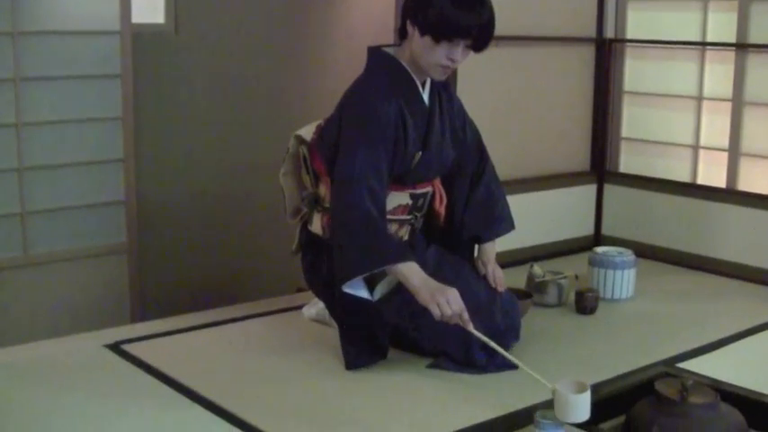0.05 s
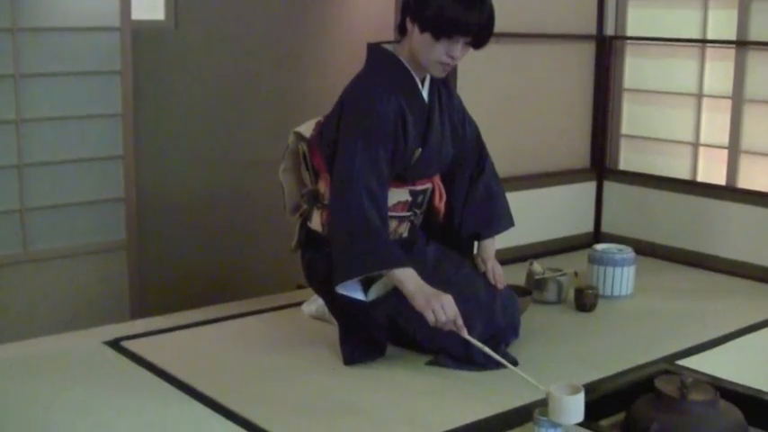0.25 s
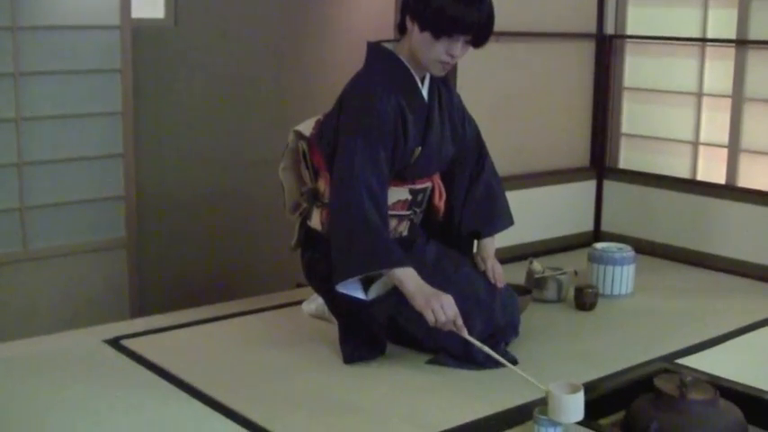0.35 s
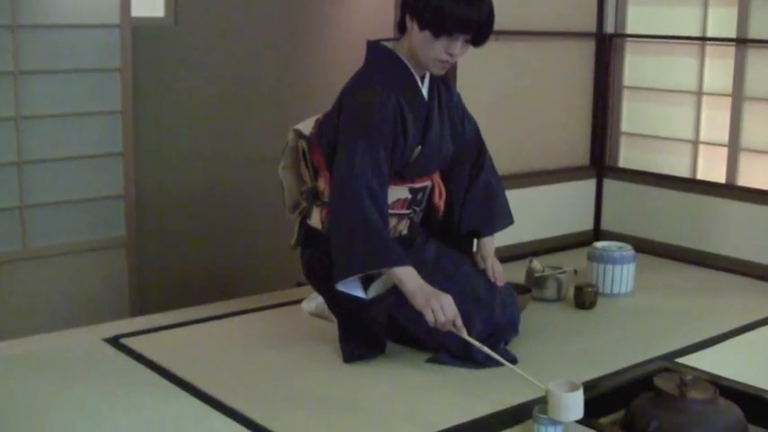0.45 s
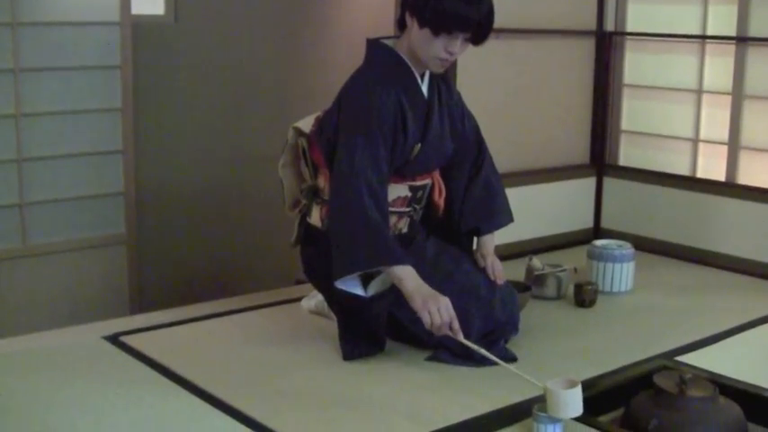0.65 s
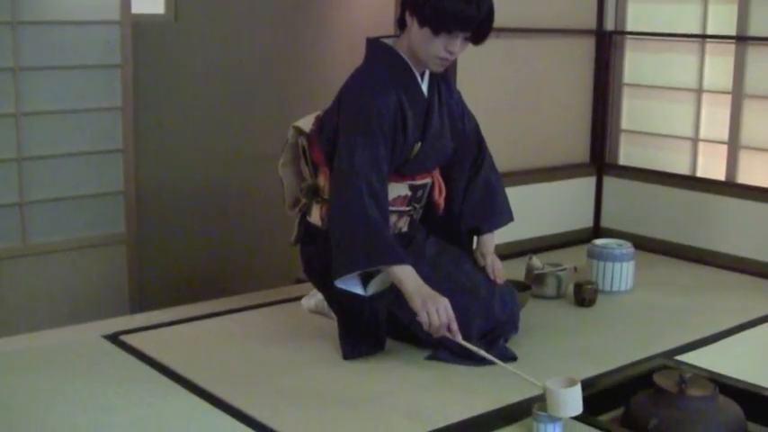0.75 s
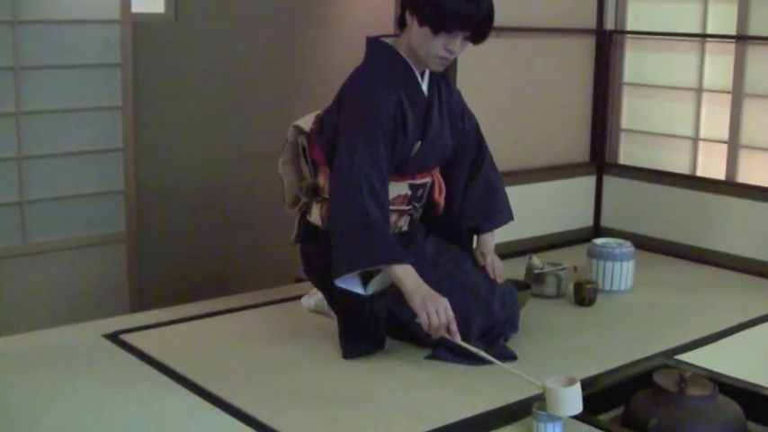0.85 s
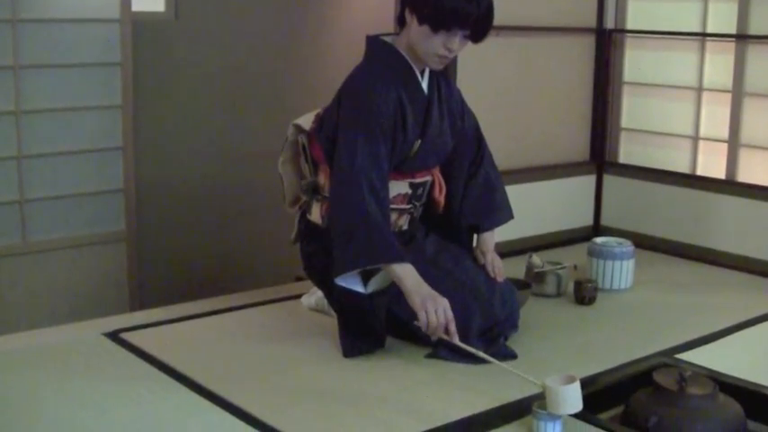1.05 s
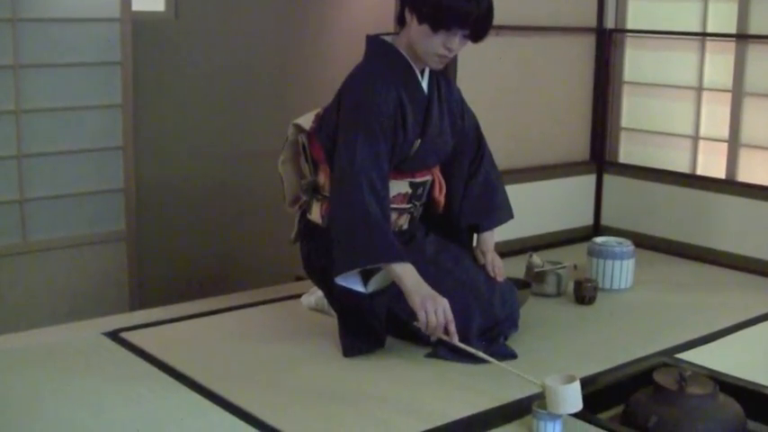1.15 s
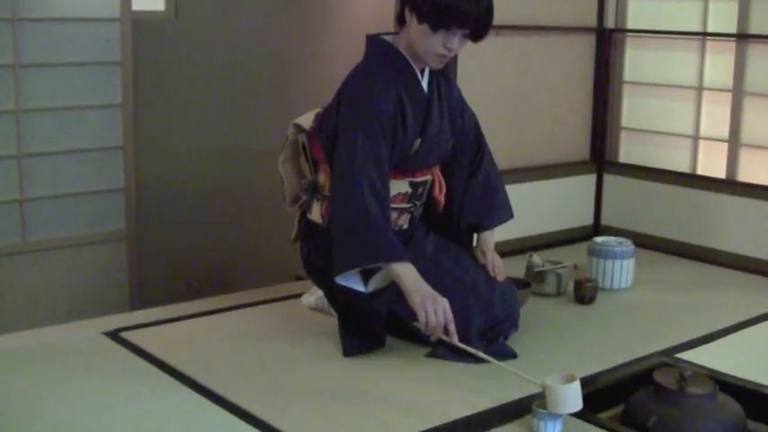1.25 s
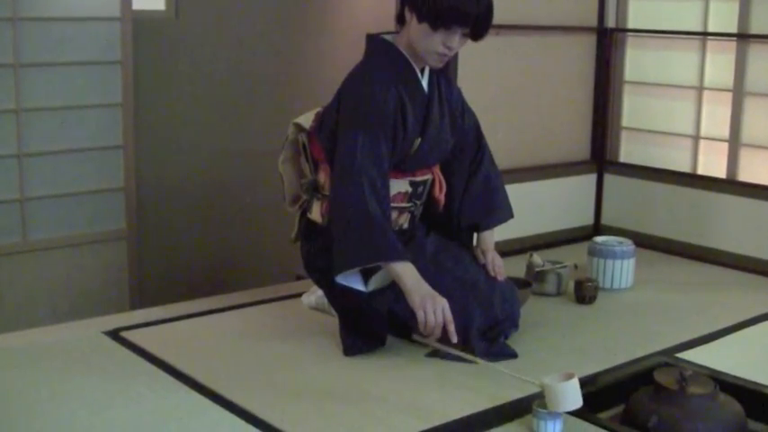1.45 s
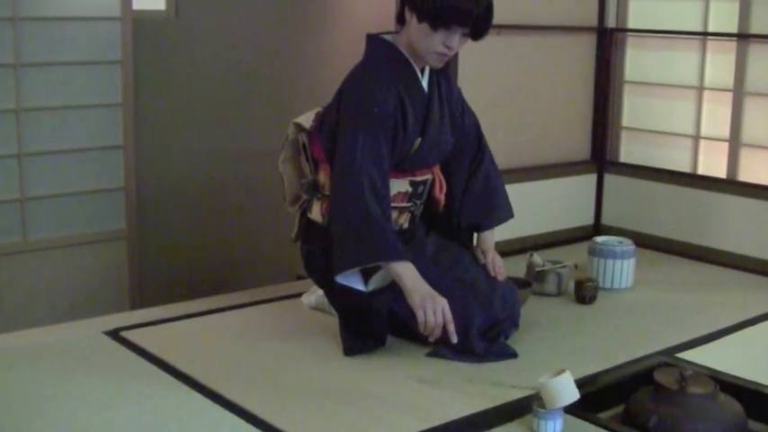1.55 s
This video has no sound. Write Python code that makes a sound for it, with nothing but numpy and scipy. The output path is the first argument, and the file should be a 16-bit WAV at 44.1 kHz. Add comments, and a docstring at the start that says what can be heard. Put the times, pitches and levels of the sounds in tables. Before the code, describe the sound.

A bamboo ladle set down with one sharp, hollow knock in a quiet room.

```python
"""A small, quiet room: a soft rush and a low, wavering hum lie underneath throughout.
At 0.2 s a bamboo ladle is set down on its rest. The hollow cup lands, rocks and settles in three
contacts within 12 ms, each a click and a short woody ring, heard together as one sharp knock.
The walls answer and carry the knock on for about half a second.
At 1.5 s the fingers brush the handle faintly as they let go."""
import sys
import numpy as np
from scipy import signal
from scipy.fft import rfft, irfft, next_fast_len
from scipy.io import wavfile
from scipy.ndimage import uniform_filter1d, map_coordinates

SR = 44100
rng = np.random.default_rng(int(sys.argv[2]) if len(sys.argv) > 2 else 0)


def pcm_store(signal):
    """Save signal as 16-bit PCM."""
    levels = np.round(np.clip(np.atleast_2d(signal), -1, 1) * 32767)
    wavfile.write(sys.argv[1], SR, levels.astype(np.int16).T)


N = 70560  # 1.6 s


def amp(db):
    """Decibels to gain."""
    return 10 ** (np.asarray(db) / 20)


def unit(x):
    """Scale to rms 1."""
    return x / np.sqrt(np.mean(x ** 2) + 1e-20)


def panned(x, db):
    """Pan so that left is louder than right by db."""
    return x * amp([[db / 2], [-db / 2]])


def along(points, hz):
    """Read a curve of (f/Hz, value) breakpoints on a log frequency axis."""
    freqs, values = np.transpose(points)
    return np.interp(np.log(hz + 1), np.log(freqs + 1), values)


def filtered(x, response):
    """Zero-phase EQ; response gives the gain at each frequency."""
    size = next_fast_len(N + SR // 2)
    return irfft(rfft(x, size) * response(np.fft.rfftfreq(size, 1 / SR)), size)[..., :N]


def coloured(x, points):
    """Minimum-phase EQ through (f/Hz, level/dB) points: nothing sounds ahead of a hit."""
    size = 2 * N
    gain = amp(along(points, np.fft.rfftfreq(size, 1 / SR)))
    cepstrum = irfft(np.log(gain), size)
    cepstrum[1:N] *= 2
    cepstrum[N + 1:] = 0
    return irfft(rfft(x, size) * np.exp(rfft(cepstrum)), size)[..., :N]


def whitened(x, width_hz):
    """Energy 1, spread evenly over bands of the given width."""
    spectrum = rfft(x, N)
    power = uniform_filter1d(abs(spectrum) ** 2, max(int(width_hz * N / SR), 1), axis=-1)
    return irfft(spectrum / np.sqrt(abs(power) + 1e-12), N)


def stereo(pair, correlation):
    """Mid/side mix of two unrelated signals, for a given left-right correlation curve."""
    angle = lambda hz: np.arccos(np.clip(along(correlation, hz), -1, 1)) / 2
    mid, side = filtered(pair, lambda hz: np.array([np.cos(angle(hz)), np.sin(angle(hz))]))
    return np.array([mid + side, mid - side])


def noise(eq):
    """Two unrelated noises of rms 1, shaped by (f/Hz, level/dB) points."""
    return unit(filtered(rng.standard_normal((2, N)), lambda hz: amp(along(eq, hz))))


def wobble(rate):
    """A smooth random modulator, rate knots a second."""
    return map_coordinates(rng.standard_normal(256), [np.arange(N) * rate / SR], mode="wrap")


# tones of the hum: f/Hz, level/dB
HUM_TONES = [(112, -79.5), (151, -77.5), (258, -68.5), (300, -68), (528, -70.5), (598, -68.5), (754, -66.5)]
def hum(depth=.6, waver_rate=9):
    """Low tones, each wavering in level and phase on its own."""
    t = np.arange(N) / SR
    out = np.zeros(N)
    for hz, db in HUM_TONES:
        waver = 1 + depth * (wobble(waver_rate) + 1j * wobble(waver_rate))
        tone = np.exp(2j * np.pi * (hz * t + rng.random()))
        out += amp(db) * unit(np.real(waver * tone))
    return out


# EQ of the rush: f/Hz, relative level/dB
RUSH_EQ = [(15, -57), (25, -38), (74, -18), (108, -9.5), (153, -8), (205, -9.5), (260, -0.5), (322, -9),
           (349, -3), (493, -4.5), (594, -2), (1190, -11), (1720, -15.5), (2440, -22), (14500, -43.5)]
# stereo image of the rush: f/Hz, left-right correlation/0-1
RUSH_IMAGE = [(30, 0.49), (65, 1), (130, 0.81), (300, .6), (700, 0.6), (2000, 0.4), (6000, 0.15),
              (12000, 0.076)]
def rush(level_db=-52):
    """A soft, steady bed of room tone, full in the low mids and wide in the treble."""
    return amp(level_db) * unit(stereo(noise(RUSH_EQ), RUSH_IMAGE))


# reverb time of the room: f/Hz, t60/s
REVERB_DECAY = [(250, .36), (650, 0.54), (1300, 0.29), (2500, 0.35), (4000, .35), (5600, 0.3), (9000, .29)]
# EQ of the reverb: f/Hz, relative level/dB
REVERB_EQ = [(250, -0.5), (650, -2), (1300, -0.5), (2500, 1.5), (4000, -1), (5600, 7.5), (7600, -7.5),
             (10500, 1), (13000, -7.5)]
# stereo image of the room, shared by the finger brush: f/Hz, left-right correlation/0-1
ROOM_IMAGE = [(250, 0.8), (1200, 0.9), (2500, 0.88), (4500, .68), (9000, 0.51)]
def room_reverb(send, wet_db=-.8, predelay_s=.0023, attack_s=.004, early_db=3, early_s=.012):
    """The walls answer after a short gap, the near ones loudest; each frequency dies at its own speed."""
    hz, frame_s, bands = signal.stft(rng.standard_normal((2, N)), SR, nperseg=256)
    decay = amp(-60 * frame_s / along(REVERB_DECAY, hz)[:, None])
    tail = signal.istft(bands * decay, SR, nperseg=256)[1][:, :N]
    age = np.maximum(np.arange(N) / SR - predelay_s, 0)
    attack = 1 - np.exp(-age / attack_s)
    early_boost = amp(early_db * np.exp(-age / early_s))
    tail = whitened(tail * attack * early_boost, width_hz=70)[:, :N // 2]
    impulse_response = coloured(stereo(tail, ROOM_IMAGE), REVERB_EQ)
    return amp(wet_db) * signal.fftconvolve(send[None], impulse_response, axes=1)[:, :N]


# EQ of skin sliding on bamboo: f/Hz, relative level/dB
BRUSH_EQ = [(3000, -20), (6500, -4), (7800, 3), (10500, 4), (12000, -11), (15000, -26)]
def finger_brush(peak_s=1.505, width_s=.032, level_db=-74, grain_db=2):
    """Skin slides off the handle: one faint, airy, grainy swell."""
    swell = np.exp(-.5 * ((np.arange(N) / SR - peak_s) / width_s) ** 2)
    grainy_gain = amp(level_db + grain_db * wobble(rate=130))
    return grainy_gain * swell * stereo(noise(BRUSH_EQ), ROOM_IMAGE)


def floor_thud(t, hz=290, db=-40, t60_s=.1, attack_s=.025):
    """The floor under the rest takes the nudge: one soft, low mode with a slow attack."""
    return amp(db - 60 * t / t60_s) * np.sin(2 * np.pi * hz * t) * (1 - np.exp(-t / attack_s))


# EQ of the contact click: f/Hz, relative level/dB
CLICK_EQ = [(40, -51.5), (130, -30), (260, -11), (500, -4.5), (1500, -1), (2300, 2.5), (3000, -6),
            (4100, 2), (5000, -14), (6400, -7.5), (7400, -3), (8400, 1), (8900, -14.5), (10800, -20.5),
            (13000, -38), (15000, -62.5)]
def contact_click(t, t60_s=.0073):
    """The transient of cup meeting rest: a tiny noise burst, a little to the right."""
    envelope = (t > 0) * amp(-60 * t / t60_s)
    burst = whitened(envelope * rng.standard_normal(N), width_hz=480) * np.linalg.norm(envelope)
    return 2 * panned(coloured(burst, CLICK_EQ), db=-4.5)


# modes of the cup and handle: f/Hz, relative level/dB, t60/s
BAMBOO_MODES = [(686.5, -27.5, 0.057), (949, -27.5, 0.056), (1123.4, -21.5, .04), (1194.5, -12, 0.058),
                (1346, -15, 0.0422), (1392, -17, .06), (1614, -18, .05), (2078, -21.5, .03),
                (2370, -22, 0.035), (2480, -11.5, 0.045), (3710, -17, 0.041), (3904, -9.5, 0.043),
                (4200, -21.5, 0.049), (5466, -20.5, 0.033), (5586, -23.5, 0.031)]
def bamboo_ring(t, cutoff_hz, attack_cycles=2.11):
    """The woody body of the knock: low modes build up slowest, and a soft contact rings mainly those."""
    ring = np.zeros(N)
    for hz, db, t60 in BAMBOO_MODES:
        envelope = amp(db - 60 * t / t60) * (1 - np.exp(-hz * t / attack_cycles))
        rolloff = 1 / np.sqrt(1 + (hz / cutoff_hz) ** 4)
        ring += rolloff * envelope * np.sin(2 * np.pi * hz * t)
    return ring


# hits of the cup on its rest: t/s, relative body level/dB, ring cutoff f/Hz, relative click level/dB
CUP_HITS = [(.2061, -7.5, 6000, -12), (.2106, -1, 5500, -13.5), (0.2176, 2, 1590, -30.5)]
def ladle_knock(low_cut_hz=218):
    """Each contact clicks, rings the bamboo and nudges the floor; the small cup radiates little bass."""
    out = np.zeros((2, N))
    for start_s, body_db, cutoff_hz, click_db in CUP_HITS:
        t = np.maximum(np.arange(N) / SR - start_s, 0)
        body = bamboo_ring(t, cutoff_hz) + floor_thud(t)
        out += amp(body_db) * body + amp(click_db) * contact_click(t)
    return signal.sosfilt(signal.butter(2, low_cut_hz, "highpass", fs=SR, output="sos"), out)


def scene():
    """The mix: the knock and its reverb up front, hum and rush beneath, then the fingers letting go."""
    knock = amp(1.4) * ladle_knock()
    reverb = room_reverb(knock.mean(axis=0))
    return panned(knock + reverb, db=-.3) + hum() + rush() + finger_brush()


def record(dry):
    """A brick-wall high cut at 15.2 kHz on the whole mix."""
    return filtered(dry, lambda hz: hz < 15200)


dry = scene()
out = record(dry)
pcm_store(out)
```